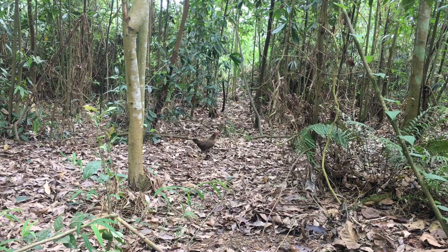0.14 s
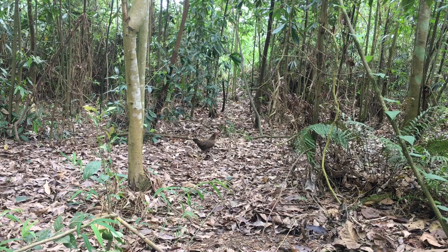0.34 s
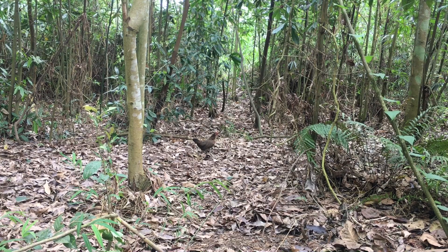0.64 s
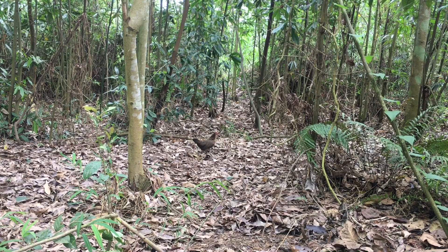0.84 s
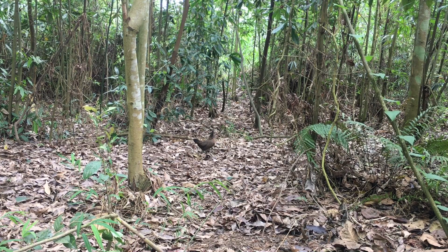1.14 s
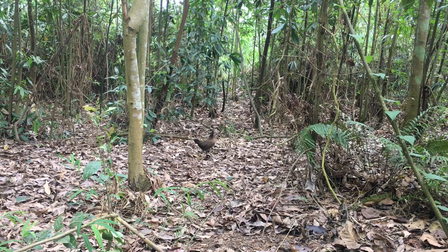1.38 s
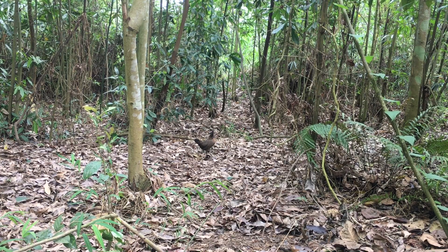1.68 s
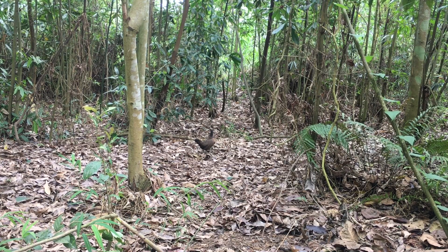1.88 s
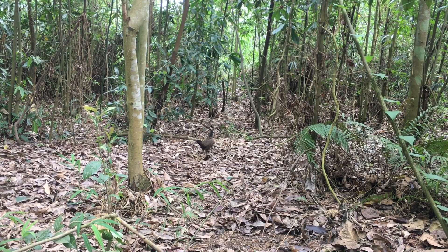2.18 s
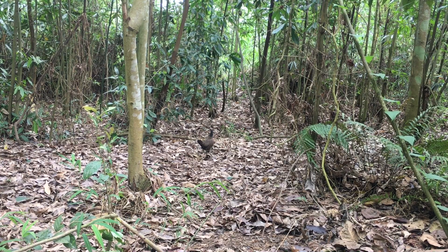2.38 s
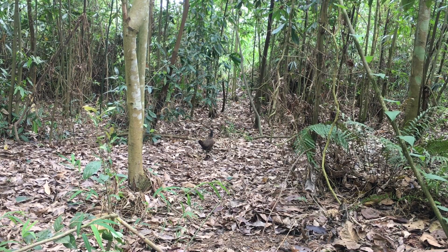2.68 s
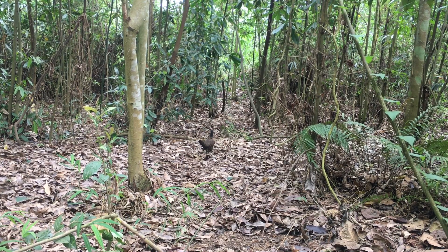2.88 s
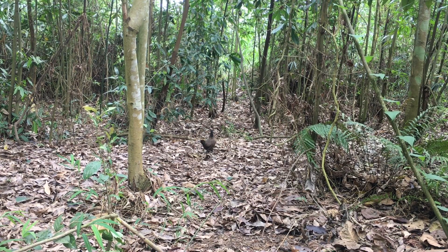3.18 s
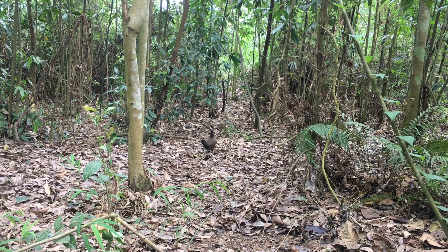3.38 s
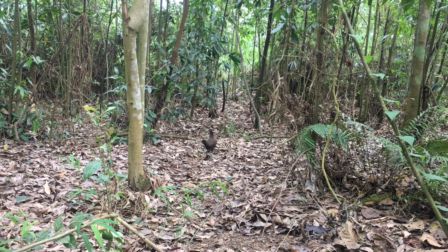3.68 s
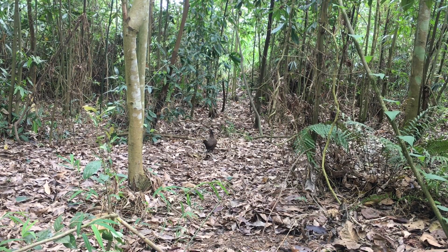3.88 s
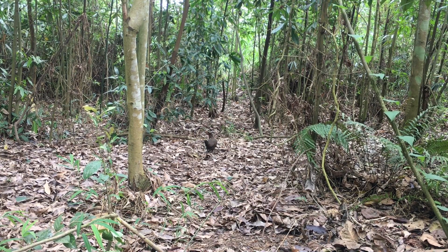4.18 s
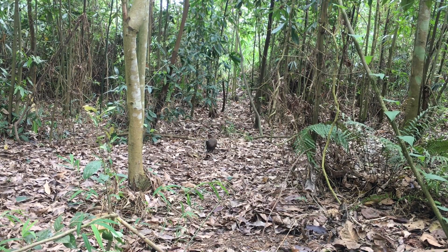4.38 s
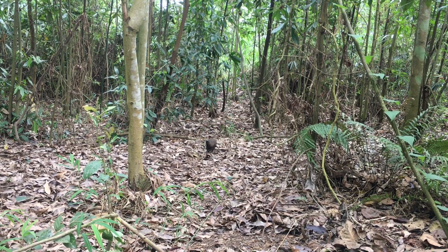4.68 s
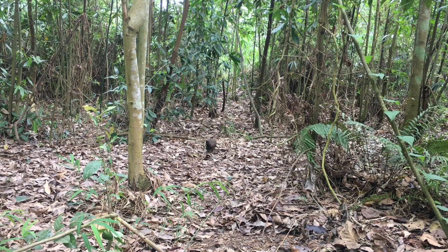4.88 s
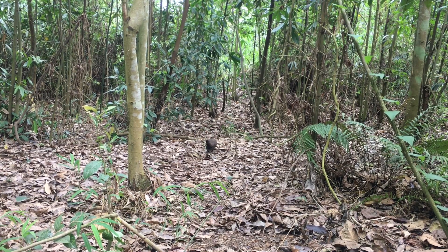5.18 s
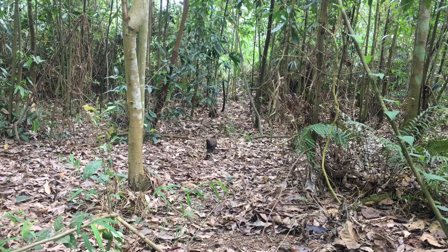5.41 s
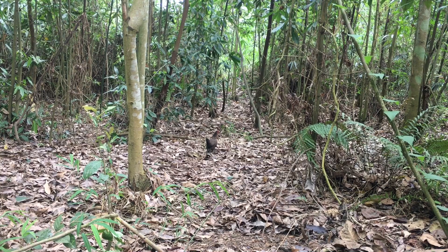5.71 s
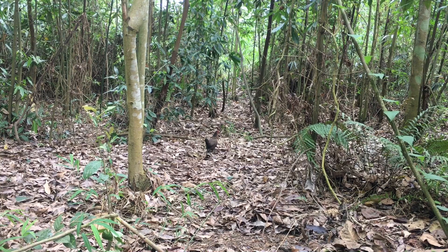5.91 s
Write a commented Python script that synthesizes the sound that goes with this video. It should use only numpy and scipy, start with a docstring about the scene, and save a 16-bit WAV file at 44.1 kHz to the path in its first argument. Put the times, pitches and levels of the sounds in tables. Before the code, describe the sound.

In a quiet forest, a wild hen gives two soft clucks, one short loud harsh cackle that echoes off trunks, then steady low clucks.

```python
"""Leaf hiss, far rumble (noise bands) and a low wavering hum run throughout; a far bird calls first (two partials).
A wild hen a few metres off gives two soft clucks (partials weighted by throat, chest and beak), then one loud
harsh cackle: two membranes of her voice organ, locked at first, then fluttering, apart and rough.
A long run of clucks follows. Trunks throw her calls back (decaying noise echoes)."""
import sys
import numpy as np
from scipy import signal
from scipy.fft import rfft, irfft
from scipy.io import wavfile
from scipy.ndimage import uniform_filter1d

SR = 44100
rng = np.random.default_rng(int(sys.argv[2]) if len(sys.argv) > 2 else 0)


def file_out(sig):
    """Save sig as 16-bit WAV at sys.argv[1]."""
    # one column per channel
    cols = np.atleast_2d(sig).T
    # limit, then scale
    lim = np.clip(cols, -1, 1)
    pcm = np.round(lim * 32767).astype(np.int16)
    wavfile.write(sys.argv[1], SR, pcm)


N = 266805


def undb(db):
    """Decibels to gain."""
    return 10 ** (np.asarray(db) / 20)


def unit(x):
    """Scale to rms 1."""
    return x / np.sqrt(np.mean(x ** 2))


def ramp(t, start_s, length_s):
    """Rises from 0 to 1 over length_s after start_s."""
    return np.clip((t - start_s) / length_s, 0, 1)


def curve(table, t):
    """Columns of a table, interpolated at the times t."""
    s, *columns = np.transpose(table)
    return [np.interp(t, s, c) for c in columns]


def walk(rate_hz, count):
    """Smooth chance with about rate_hz turns a second, rms 1."""
    k = max(int(SR / rate_hz), 2)
    smooth = uniform_filter1d(rng.standard_normal(count), k)
    return unit(uniform_filter1d(smooth, k))


def shape_db(table, hz):
    """A spectrum table read on a log-frequency axis."""
    f, db = np.transpose(table)
    return np.interp(np.log(np.maximum(hz, 1)), np.log(f), db)


def colour(x, table, peaks):
    """Causal filter with the table's spectrum plus bell-shaped peaks or dips, from the folded cepstrum."""
    size = 4096
    hz = np.arange(size // 2 + 1) * SR / size
    db = shape_db(table, hz)
    for f, width_hz, top_db in peaks:
        db = db + top_db * np.exp(-2 * ((hz - f) / width_hz) ** 2)
    cep = irfft(np.log(undb(db)))
    cep[1:size // 2] *= 2
    cep[size // 2 + 1:] = 0
    impulse = irfft(np.exp(rfft(cep)))
    return signal.fftconvolve(x, impulse)[:len(x)]


def turns(hz):
    """Running phase of an oscillator, in radians."""
    return 2 * np.pi * np.cumsum(hz) / SR


def forest():
    """Octave bands of leaf hiss and far rumble, drifting and flickering in level, plus a wavering hum."""
    # bed spectrum before scaling to rms 1: f/Hz, relative density/dB
    spectrum = [(18, -35), (30, -8), (55, -1.5), (178, -10), (264, -14.5), (352, -14.5), (457, -19),
                (714, -17), (835, -18.5), (977, -17), (1690, -19.5), (2320, -21), (4960, -27),
                (6440, -29.5), (15700, -42)]
    # drift about the bed level: t/s, leaf hiss/dB, far rumble/dB
    drift = [(0.0, -2.1, 2), (1.6, -1.7, 1), (2.4, -0.2, 0), (3.2, -.1, 1), (3.7, -.4, -2.5),
             (6.05, -0.4, -1)]
    # mean hum level: t/s, rms level/dB
    hum_level = [(0.0, -64), (1.5, -64), (2.4, -47), (3.6, -56.5), (4.7, -46.5), (6.05, -51)]
    bed_db, hum_hz = -43, 47
    t, hz = np.arange(N) / SR, np.arange(N // 2 + 1) * SR / N
    bed = rfft(rng.standard_normal(N)) * undb(shape_db(spectrum, hz))
    bed = bed / np.sqrt(np.mean(irfft(bed, N) ** 2))
    hiss_db, rumble_db = curve(drift, t)
    out = 0
    for low_hz in 20 * 2. ** np.arange(10):
        band = irfft(bed * (hz >= low_hz) * (hz < 2 * low_hz), N)
        # hiss drift fades out below 900 Hz; rumble drift moves the three lowest bands
        band_db = hiss_db * min(low_hz / 900, 1) + rumble_db * (low_hz < 100)
        out = out + band * undb(band_db + 0.46 * walk(8.0, N))
    hum_db, = curve(hum_level, t)
    hum_gain = np.sqrt(2) * undb(hum_db + 1.9 * walk(8.8, N))
    hum = hum_gain * np.sin(turns(hum_hz * (1 + 0.15 * walk(3.88, N))))
    return undb(bed_db) * out + hum


def far_bird():
    """Gliding notes of two partials, blurred in pitch and level by the long way through the trees."""
    # notes: t/s, length/s, start f/Hz, held f/Hz, first partial level/dB, second partial level/dB
    bird_notes = [(0.0, .1, 848, 850, -59, -70), (.16, 0.15, 845, 856, -59, -62),
                  (.31, 0.18, 856, 848, -60.5, -61), (.47, .19, 892, 808, -59.5, -55.5),
                  (.70, 0.086, 800, 795, -75, -55.5), (0.818, 0.22, 810, 803, -74, -55)]
    glide_s, edge_s = .025, .025
    out = np.zeros(N)
    for s, length_s, start_hz, held_hz, first_db, second_db in bird_notes:
        t = np.arange(int(length_s * SR)) / SR
        hz = held_hz + (start_hz - held_hz) * np.exp(-t / glide_s)
        phase = turns(hz * (1 + 0.005 * walk(50, len(t))))
        first = undb(first_db + 2.0 * walk(40, len(t))) * np.sin(phase)
        second = undb(second_db + 1.7 * walk(40, len(t))) * np.sin(2 * phase)
        edges = ramp(t, 0, edge_s) * (1 - ramp(t, length_s - edge_s, edge_s))
        out[int(s * SR):][:len(t)] += np.sqrt(2) * edges * (first + second)
    return out


def trunks(x, near_db=1.0, near_s=0.05, tail_db=-16.5, tail_hz=9000, t60_s=.38):
    """Bright scatter off the nearest trunks, plus a duller decaying tail from deeper in the wood."""
    t = np.arange(SR) / SR
    near = rng.standard_normal(SR) / (1 + (t / near_s) ** 3.5) * (t > .004)
    near = signal.lfilter([1, -.85], 1, near)  # treble tilt
    tail = signal.sosfilt(signal.butter(1, tail_hz, fs=SR, output="sos"), rng.standard_normal(SR))
    tail = tail * np.exp(-np.log(1000) * t / t60_s) * np.minimum(t / 0.006, 1)
    echo = (undb(near_db) * unit(near) + undb(tail_db) * unit(tail)) / np.sqrt(SR)
    return signal.fftconvolve(x, echo)[:N]


def clucks(arch=0.139, width=0.29, beak_hz=4500, skirt_db=-34.0):
    """Short notes of arching pitch; a half-closed throat, the chest and the beak weight the partials."""
    # clucks: t/s, level before the envelope/dB, pitch f/Hz, length/s, throat resonance f/Hz
    cluck_notes = [(1.632, -41.5, 324.4, 0.028, 1290), (1.71, -35.5, 374.3, 0.037, 1300),
                   (3.453, -37.5, 333, 0.027, 1340), (3.667, -42, 316.7, 0.037, 1340),
                   (3.888, -40, 329, 0.032, 1310), (4.080, -42.5, 306, 0.029, 1420),
                   (4.314, -41, 337, 0.02, 1420), (4.517, -43.5, 328, 0.037, 1190),
                   (4.738, -43.5, 333, 0.029, 1050), (4.966, -38, 354, 0.02, 1100),
                   (5.179, -39, 327, 0.033, 1030), (5.359, -41, 343, 0.036, 1080),
                   (5.564, -39.5, 348.5, 0.036, 1120), (5.734, -37, 358.5, 0.037, 1260),
                   (5.917, -37.5, 354, 0.037, 1240)]
    # chest and beak levels at the middle throat setting; both grow as the throat opens
    mid_throat_hz = 1230
    mid_chest_db, chest_db_per_oct = -8, 20
    mid_beak_db, beak_db_per_oct = -15.5, 22
    out = np.zeros(N)
    for s, db, pitch_hz, length_s, throat_hz in cluck_notes:
        opening_oct = np.log2(throat_hz / mid_throat_hz)
        chest_db = mid_chest_db + chest_db_per_oct * opening_oct
        beak_db = mid_beak_db + beak_db_per_oct * opening_oct
        u = np.linspace(0, 1, int(length_s * SR))
        phase = turns(pitch_hz * (1 - arch * (2 * u - .9) ** 2 + 0.024 * walk(570, len(u))))
        k = np.arange(1, 17)[:, None]
        detune = np.log(k * pitch_hz / throat_hz) / width
        throat = np.exp(-.5 * detune ** 2)
        chest = undb(chest_db) * (k == 1)
        beak = undb(beak_db) * np.exp(-.5 * ((k * pitch_hz - beak_hz) / 300) ** 2)
        gain = throat + chest + beak + undb(skirt_db)
        # the throat delays partials around its resonance: pulses ring instead of spiking
        lag = 2 * np.arctan(detune)
        note = -unit(np.sum(gain * np.cos(k * phase - lag), axis=0))
        # a little air leaks past the membrane and blurs the partials
        note = note * (1 + 0.17 * walk(1000, len(u)))
        envelope = np.sin(np.pi * u ** 1.08) ** 0.69
        out[int(s * SR):][:len(u)] += undb(db) * envelope * note
    return out


def membrane(phase, count, weak, weak_gain):
    """Sharp closing pulses as a sum of partials; those named weak get weak_gain."""
    return sum((weak_gain if k in weak else 1) * np.cos(k * phase) for k in range(1, count + 1))


def cackle(rasp_db=17.0, rasp_hz=2400):
    """Two membranes share one air stream: the low one and a slower flutter tug at the timing of the high one."""
    # membranes before the throat: t/s, high half-rate f/Hz, low partial level/dB, high partial level/dB
    contour = [(1.803, 757, -29, -11), (1.818, 800, -19.5, -16.5), (1.830, 848, -13.5, -19),
               (1.850, 848, -15, -24), (1.872, 848.5, -15.5, -15), (1.890, 905, -17, -13),
               (1.965, 938, -22.5, -12.5), (1.985, 916.6, -20, -13), (2.003, 866.3, -24.5, -11.5),
               (2.076, 827.3, -27, -11), (2.095, 750, -23.5, -14.5), (2.120, 706, -22, -13.5)]
    # open throat response: f/Hz, level/dB
    throat = [(500, -36), (850, -19), (1250, -3), (1550, 3.5), (1800, -1.5), (2100, -4), (2400, -17.5),
              (2700, -24.5), (3300, -22.5), (4200, -19.5), (5300, -30), (7000, -37.5), (11000, -41.5),
              (16000, -57)]
    # windpipe resonances: f/Hz, width/Hz, level/dB
    pipe_peaks = [(3020, 260, 13), (3850, 300, 4), (4660, 400, 8), (6000, 320, 10), (8050, 450, 7),
                  (9700, 500, 5), (12000, 900, 5)]
    attack_s, release_s = 0.0055, 0.0057
    apart_s = 1.874  # the membranes lose their lock
    low_start_hz, low_top_hz, low_settled_hz, low_rise_s = 371.6, 426.5, 417.6, .027
    # the flutter starts faster and deeper by the extras and calms down
    flutter_s, flutter_rise_s, flutter_calm_s = 1.85, 0.0081, 0.0399
    flutter_hz, flutter_extra_hz = 135.2, 45.07
    flutter_depth, flutter_extra_depth = 0.38, 0.62
    # a tone this far under the main line starts with the flutter
    under_gap_hz, under_db, under_fade_s = 385, -22, 0.059

    start, stop = int(contour[0][0] * SR), int(contour[-1][0] * SR)
    count = stop - start
    t = np.arange(start, stop) / SR
    high_hz, low_db, high_db = curve(contour, t)
    apart, fluttering = ramp(t, apart_s, 0.0126), ramp(t, flutter_s, flutter_rise_s)
    # the low membrane slides up, then settles as the flutter starts
    low_hz = low_start_hz + (low_top_hz - low_start_hz) * ramp(t, t[0], low_rise_s)
    low_hz = low_hz - (low_top_hz - low_settled_hz) * fluttering
    low_db = low_db + 1.5 * fluttering * walk(45, count)
    fresh = np.exp(-np.maximum(t - flutter_s, 0) / flutter_calm_s)
    depth = flutter_depth + flutter_extra_depth * fresh + 0.24 * walk(38, count)
    depth = fluttering * np.clip(depth, 0, 1)
    under_hz = 2 * high_hz - under_gap_hz + 26.0 * walk(38.8, count)

    # roughness grows; the first beats are unsteady as well
    rough = .3 * ramp(t, t[0], .06) + .45 * np.exp(-(t - t[0]) / .014)
    low_hz = low_hz * (1 + 0.022 * rough * walk(320, count))
    high_hz = high_hz * (1 + .07 * rough * walk(250, count))
    # locked, the high half-rate is exactly twice the low rate
    low = turns(low_hz)
    high = turns(apart * high_hz + (1 - apart) * 2 * low_hz)
    flutter = turns((flutter_hz + flutter_extra_hz * fresh) * (1 + 0.1005 * walk(110, count)))
    # timing tugs put side lines around each partial; a throb also sways the high membrane's loudness
    high = high + depth * (.6 * np.sin(flutter) + .3 * np.sin(2 * flutter) + .3 * np.sin(low))
    throb = 1 + 0.41 * depth * np.cos(flutter)
    low = low + .12 * depth * np.sin(flutter)

    # once it flutters, the low membrane yields its lower partials to the high one
    yielded = undb(-15 * ramp(t, flutter_s, .04))
    tone = undb(low_db) * membrane(low, count=36, weak=range(1, 5), weak_gain=yielded)
    # every second beat of the high membrane is nearly like the first: odd partials faint and patchy
    odd = undb(-8 + 14 * rough * walk(60, count))
    tone += undb(high_db) * throb * membrane(high, count=16, weak=range(1, 17, 2), weak_gain=odd)
    under = np.cos(turns(under_hz * (1 + 0.0217 * walk(315, count))) + 0.86 * np.sin(flutter))
    under_gain = np.sqrt(2) * undb(under_db + 2.2 * walk(53, count))
    under_fade = 1 - ramp(t, t[-1] - under_fade_s, under_fade_s)
    tone += under_gain * under * fluttering * under_fade

    # turbulence at the membranes is mostly treble
    effort = rough * (undb(low_db) + undb(high_db))
    high_pass = signal.butter(4, rasp_hz, "high", fs=SR, output="sos")
    rasp = signal.sosfilt(high_pass, rng.standard_normal(count))
    air = undb(5) * rng.standard_normal(count) + undb(rasp_db) * rasp
    edges = ramp(t, t[0], attack_s) * (1 - ramp(t, t[-1] - release_s, release_s))
    out, ring = np.zeros(N), np.zeros(N)
    out[start:stop] = (tone + effort * air) * edges ** 2
    # the windpipe starts to ring as the neck stretches, then less as it slackens
    ring[start:stop] = ramp(t, t[0], .035) * np.linspace(1, .3, count)
    return colour(ring * out, throat, pipe_peaks) + colour((1 - ring) * out, throat, [])


def scene():
    """The hen with her echoes, the far bird and the forest bed."""
    hen = cackle() + clucks()
    return (hen + trunks(hen) + far_bird() + forest())[None, :]


def record(dry):
    """The microphone has two narrow dips and drops the deepest bass; the recorder cuts the top."""
    # microphone response: f/Hz, level/dB
    mic_response = [(20, 0), (6500, 0), (9600, 1), (11200, -1.2), (13500, -0.5), (15700, -2)]
    # narrow dips: f/Hz, width/Hz, level/dB
    dips = [(4950, 300, -4), (10300, 500, -3)]
    bass_hz, top_hz = 36, 15720
    dry = colour(dry[0], mic_response, dips)[None, :]
    dry = signal.sosfilt(signal.butter(6, bass_hz, "high", fs=SR, output="sos"), dry)
    return signal.sosfilt(signal.ellip(12, .2, 100, top_hz, fs=SR, output="sos"), dry)


dry = scene()
out = record(dry)
file_out(out)
```